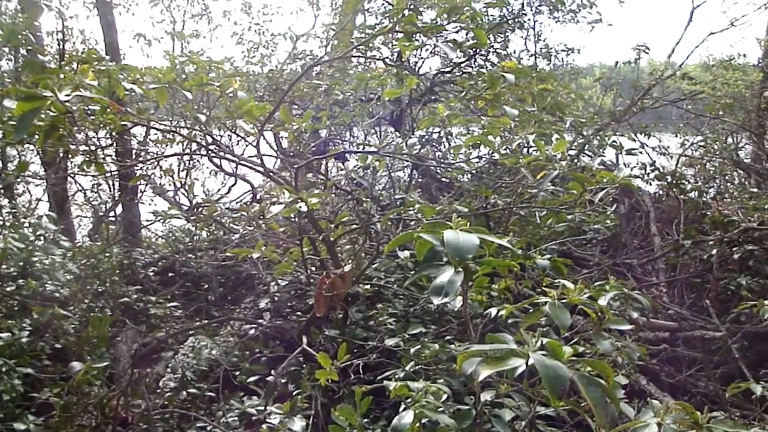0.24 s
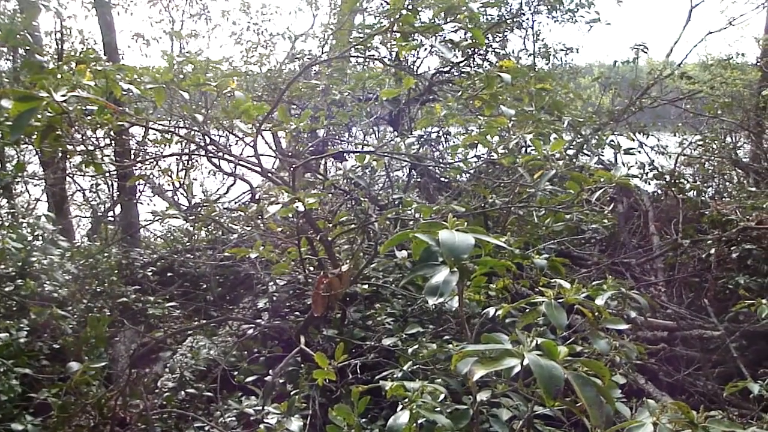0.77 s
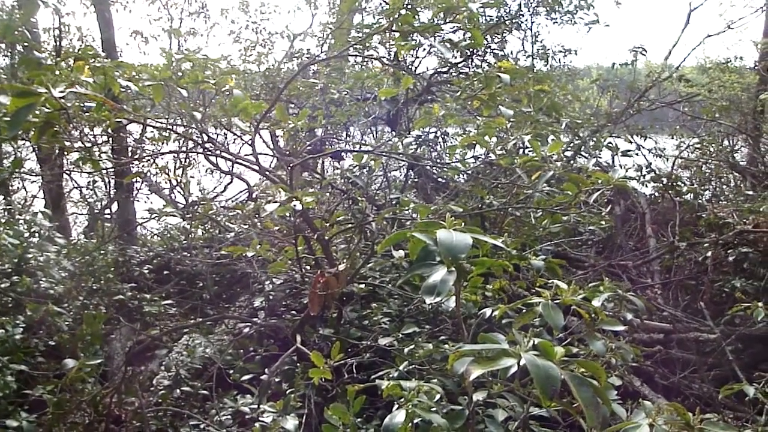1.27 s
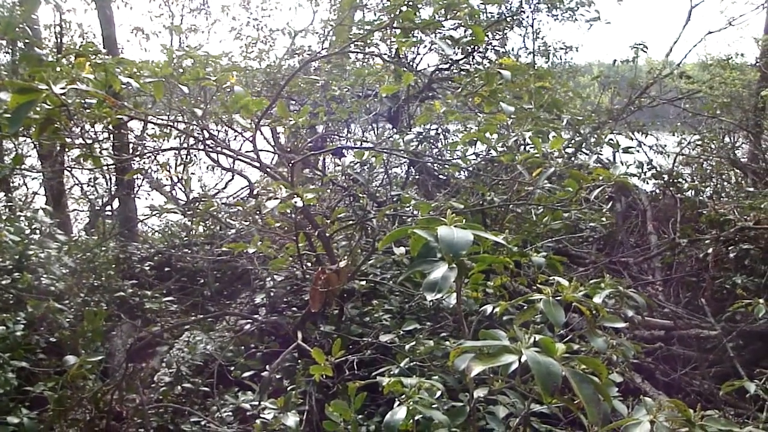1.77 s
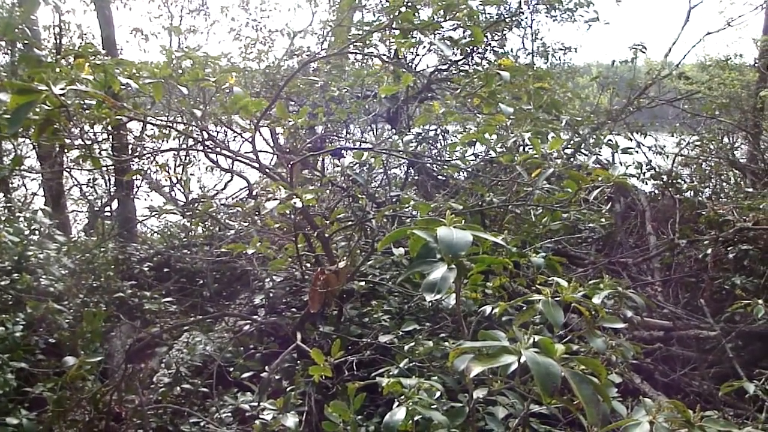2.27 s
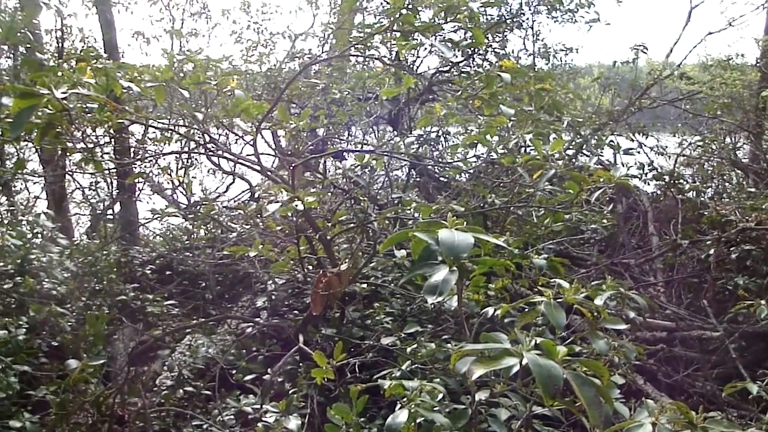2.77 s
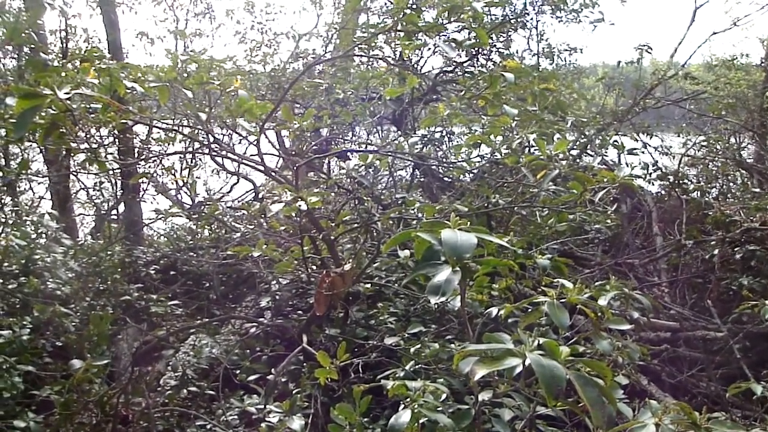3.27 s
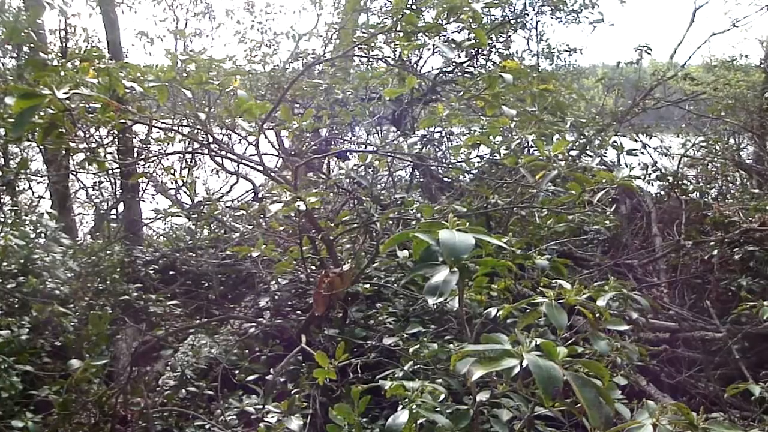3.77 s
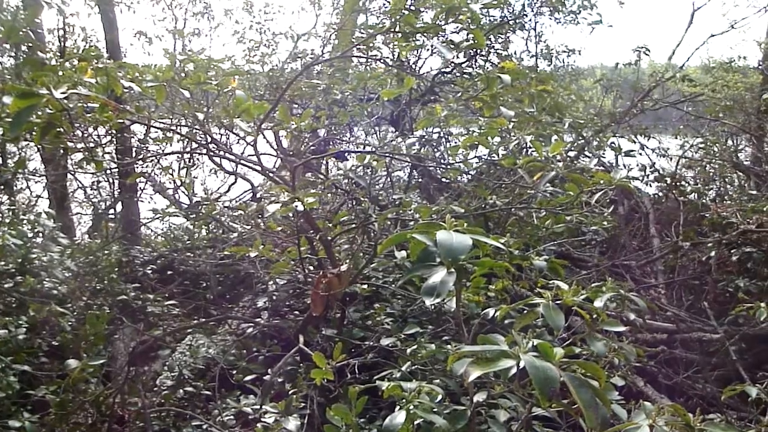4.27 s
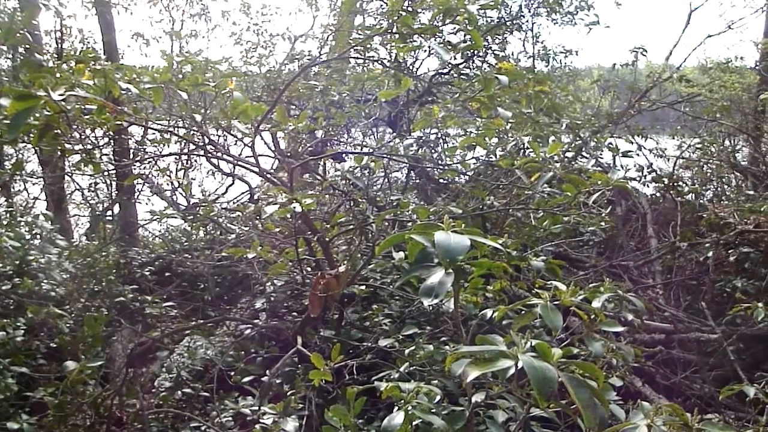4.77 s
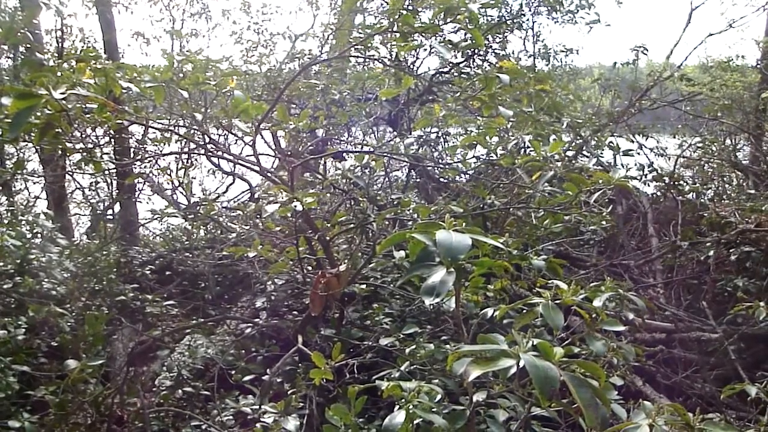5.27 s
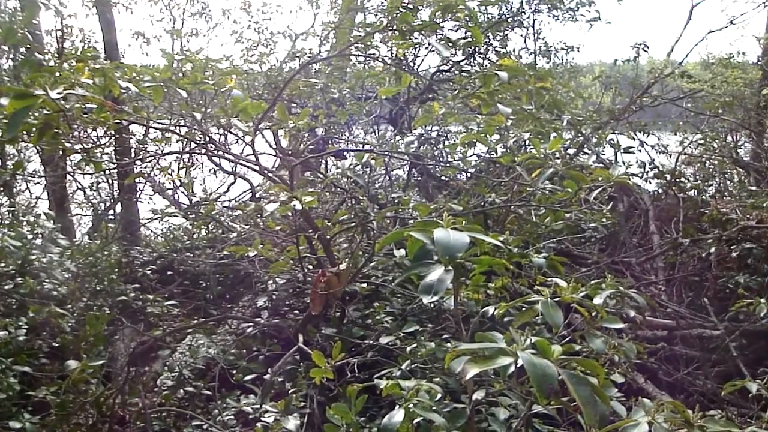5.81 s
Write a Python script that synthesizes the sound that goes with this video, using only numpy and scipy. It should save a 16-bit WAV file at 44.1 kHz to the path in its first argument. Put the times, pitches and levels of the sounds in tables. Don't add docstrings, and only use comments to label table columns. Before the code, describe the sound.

A wooded pond in still air, heard through one small, slightly hissy microphone. From 0 s distant toads and tree frogs are already trilling, fast pulsed whistles around 1.4 to 1.75 kHz, blurred by echoes from water and trunks. One of them stops near 0.4 s; a faint rival with quicker pulses ends around 1 s, and another faint high call passes between 0.4 and 1.2 s. At about 1 s the nearest, loudest frog begins, its pitch climbing from 1.54 to 1.67 kHz by 1.5 s, then settling near 1.64 kHz at roughly 43 pulses a second, slowing slightly from a quicker start. At 2.7 s a higher frog, near 1.9 kHz, swells in beneath it with a distinct echo, dipping briefly at 4.6 s. Two far callers stop around 4.2 s. A very faint low drone swells near 3 and 5.2 s. The near trill sags and stops just before 6 s, leaving the higher one.

```python
import sys
import numpy as np
from scipy import signal
from scipy.fft import rfft, irfft
from scipy.io import wavfile
from scipy.ndimage import uniform_filter1d

SR = 44100
rng = np.random.default_rng(int(sys.argv[2]) if len(sys.argv) > 2 else 0)


def pcm_store(signal):
    levels = np.round(np.clip(np.atleast_2d(signal), -1, 1) * 32767)
    wavfile.write(sys.argv[1], SR, levels.astype(np.int16).T)


def level_to_linear(level):
    exponent = np.asarray(level, float) / 20
    return 10 ** exponent


N = 266540
TIME = np.arange(-SR // 2, N) / SR

# pitch_hz, width_hz, level_db
DRONE_RESONANCES = [(174.6, 19, 1.5), (221, 29, -1), (304, 74, -5.5), (380, 80, -9)]
# full_s, hold_until_s, rise_s, fall_s, level_db
DRONE_SWELLS = [
    (2.7, 3.177, .3, 0.26, -64),
    (5.018, 5.49, 0.193, 0.42, -59),
]
# frequency_hz, density_db (per Hz)
AIR_SPECTRUM = [(15, -49), (25, -27.5), (60, -11), (183, -2.5), (500, -3), (1200, -6.5), (2200, -10.5),
                (3300, -13), (5300, -16.5), (8000, -18), (10800, -21)]
PACE = {"near": (.96, .756, 42.619, 9.808, 1.382), "high": (2.7, .122, 41.775, 5.785, 1.295),
        "early": (0, .48, 34.5, 3.3, .25), "low": (-.5, 0, 42, 15, 2.5), "middle": (0, .71, 40, 15.9, 8),
        "faint": (.3, 0, 45.45, 0, 1), "rival": (0, -.11, 54.375, 0, 1)}
SAC_GLIDE = {"high": (2.7, 1815, 1906, 0.2), "early": (0.5, 1756, 1727, .5), "low": (0, 1435, 1440, .5),
             "middle": (0, 1530, 1511, 0.03), "faint": (0.27, 1767, 1880, .8),
             "rival": (0.21, 1705, 1620, 0.23)}
CALL = {"near": (.975, 5.95, -36.6, 3.5, .25), "high": (2.7, 6.1, -44.9, 18, .22),
        "early": (-.5, .38, -49, 0, 1), "low": (-.5, 4.19, -54.5, 5, .2),
        "middle": (-.5, 4.19, -48.5, 11, .6), "faint": (.4, 1.2, -57, 0, 1),
        "rival": (-.5, 1.05, -61, 0, 1)}
CALL_SWELLS = {"near": [(.99, 0.013, 1.5), (1.07, 0.055, -3), (1.5, 0.2, 2), (2.1, 0.29, -0.5),
               (2.75, 0.098, 1.5), (3.05, 0.058, -0.5), (4.15, 0.17, -1.5), (4.7, 0.19, 0.5), (5.12, 0.087, -1),
               (5.5, 0.33, 0), (3.2, 0.087, 1.5), (2.45, 0.088, 1.5)], "high": [(3.5, 0.4, 0.5), (4.1, 0.13, 2),
               (4.47, 0.122, 1), (4.61, 0.034, -9), (4.95, .2, 1.5), (5.7, 0.17, 2.5)],
               "early": [(.05, .06, -3.5), (.16, 0.13, 3), (.36, 0.083, -5)], "low": [(.03, 0.17, 3),
               (.6, 0.16, -10.5), (3.1, 0.5, -6), (3.65, 0.23, 2.5), (4.15, .1, -2)], "middle": [(.52, 0.16, 2),
               (.66, 0.012, -14), (.74, 0.098, 3), (2.9, 0.35, 1), (3.6, .3, 2), (4.15, 0.079, -3)],
               "faint": [(.75, 0.29, -5.5), (1.3, .1, -3)], "rival": [(.12, 0.28, 14), (.97, 0.071, 9)]}
# time_s, pitch_hz
NEAR_PITCH = [
    (.97, 1540),
    (1.05, 1580),
    (1.15, 1629),
    (1.559, 1667),
    (1.901, 1640),
    (2.6, 1652),
    (2.8, 1638),
    (5.4, 1633),
    (5.94, 1621),
]
# time_s, ahead_pulses (negative: behind)
NEAR_AHEAD = [
    (.96, -.12),
    (1.65, .19),
    (2.35, -.2),
    (3.3, 0),
    (3.8, .17),
    (4.5, -.08),
    (5.4, .07),
    (5.75, -.1),
    (5.94, -.85),
]


def coloured(gain):
    hz = np.arange(N // 2 + 1) * SR / N + 1
    return irfft(rfft(rng.standard_normal(N)) * gain(hz), N)


def level(x, db):
    return x * level_to_linear(db) / np.sqrt(np.mean(x ** 2))


def air():
    hz, db = np.transpose(AIR_SPECTRUM)
    return level(coloured(lambda f: level_to_linear(np.interp(np.log(f), np.log(hz), db))), -53.5)


def drone():
    def resonances(f):
        return sum(level_to_linear(db) / (1 + (2 * (f - hz) / width) ** 2) for hz, width, db in DRONE_RESONANCES)

    t = TIME[-N:]
    swells = 0
    for full, hold, rise, fall, db in DRONE_SWELLS:
        away = np.maximum(0, np.maximum((full - t) / rise, (t - hold) / fall))
        swells = swells + level_to_linear(db - 16 * away)
    return level(coloured(resonances), 0) * swells


def pond(wet_db, t60_s, bank_ms, bank_db):
    t = np.arange(SR // 2) / SR
    trunks = rng.standard_normal(len(t)) * (rng.random(len(t)) < .2)
    echoes = trunks * (t > .009) * np.exp(-np.log(1000) * t / t60_s)
    echoes *= level_to_linear(wet_db) / np.sqrt(np.sum(echoes ** 2))
    echoes[0] = 1
    echoes[int(bank_ms * SR / 1000)] += level_to_linear(bank_db)
    return echoes / np.sqrt(np.sum(echoes ** 2))


def settle(start_s, time_s):
    return np.exp(-np.maximum(TIME - start_s, 0) / time_s)


def pace(name):
    start, sung, rate, extra, settling = PACE[name]
    return sung + rate * (TIME - start) + extra * settling * (1 - settle(start, settling))


def sac(name):
    start, first_hz, rest_hz, glide = SAC_GLIDE[name]
    return rest_hz + (first_hz - rest_hz) * settle(start, glide)


def heard(name):
    start, end, db, shy_db, warming = CALL[name]
    changes = sum(change_db * np.exp(-((TIME - s) / width) ** 2) for s, width, change_db in CALL_SWELLS[name])
    return np.where((TIME > start) & (TIME < end), db - shy_db * settle(start, warming) + changes, -200)


def trill(sung, hz, db, burst_ms, rise, sag_hz, scatter_db, second_db, third_db, wet_db, t60_s,
          bank_ms=12, bank_db=-20, count=999):
    index = np.round(sung).astype(int)
    chance = rng.standard_normal((np.ptp(index) + 1, 3))[index - index[0]].T
    rate = uniform_filter1d(np.gradient(sung) * SR, size=4000)
    share = (rate + 1) * burst_ms / 1000
    place = (sung - index) / share + .39 + 0.03 * chance[0]
    opening = np.clip(place / rise, 0, 1)
    closing = np.clip((1 - place) / .55, 0, 1)
    gate = (np.sin(np.pi / 2 * opening) * np.sin(np.pi / 2 * closing)) ** 2 * (index <= count)
    burst_hz = hz - sag_hz * (1 - closing) ** 2
    phase = 2 * np.pi * np.cumsum(burst_hz) / SR + 10 * chance[1]
    tone = np.sin(phase) + level_to_linear(second_db) * np.sin(2 * phase) + level_to_linear(third_db) * np.sin(3 * phase)
    effort = uniform_filter1d(level_to_linear(db), size=300)
    voice = gate * tone * effort * level_to_linear(scatter_db * chance[2]) / np.sqrt(share / 4)
    return signal.fftconvolve(voice, pond(wet_db, t60_s, bank_ms, bank_db))[:len(TIME)][-N:]


def caller(name, **voice):
    return trill(pace(name), sac(name), heard(name), **voice)


def far_callers():
    low = caller("low", burst_ms=14.2, rise=.26, sag_hz=40, scatter_db=2.6,
                 second_db=-46, third_db=-49, wet_db=2.3, t60_s=.64)
    middle = caller("middle", burst_ms=14.6, rise=.45, sag_hz=40, scatter_db=1.0,
                    second_db=-45, third_db=-45, wet_db=-1.5, t60_s=.6)
    faint = caller("faint", burst_ms=16.5, rise=.79, sag_hz=40.4, scatter_db=1.0,
                   second_db=-49, third_db=-48, wet_db=5.2, t60_s=.33)
    return low + middle + faint


def finishing_pair():
    voice = dict(burst_ms=12.5, rise=.4, sag_hz=40, scatter_db=1.2, second_db=-45, third_db=-45)
    early = caller("early", wet_db=-4.5, t60_s=.4, **voice)
    rival = caller("rival", wet_db=-1.6, t60_s=.45, **voice)
    return early + rival


def high_caller():
    return caller("high", burst_ms=17, rise=.36, sag_hz=-60, scatter_db=1.4, second_db=-29, third_db=-51,
                  wet_db=-4, t60_s=.45, bank_ms=17.5, bank_db=-6)


def near_caller():
    sung = pace("near") + np.interp(TIME, *np.transpose(NEAR_AHEAD))
    hz = np.interp(TIME, *np.transpose(NEAR_PITCH))
    return trill(sung, hz, heard("near"), burst_ms=14.6, rise=.33, sag_hz=105, scatter_db=1.0,
                 second_db=-44, third_db=-37.3, wet_db=-7.5, t60_s=.85, bank_ms=11, bank_db=-18, count=224)


def scene():
    chorus = far_callers() + finishing_pair() + high_caller() + near_caller()
    return (air() + drone() + chorus)[None, :]


def band_limit(x):
    return signal.sosfilt(signal.butter(12, 11020, fs=SR, output="sos"), x)


def record(dry):
    top_cut = signal.ellip(10, .2, 70, 10950, fs=SR, output="sos")
    mix = signal.sosfilt(top_cut, dry)
    return band_limit(mix)


dry = scene()
out = record(dry)
pcm_store(out)
```